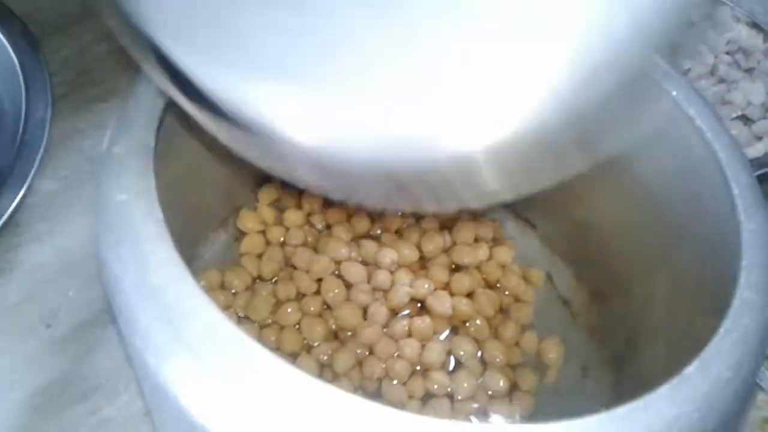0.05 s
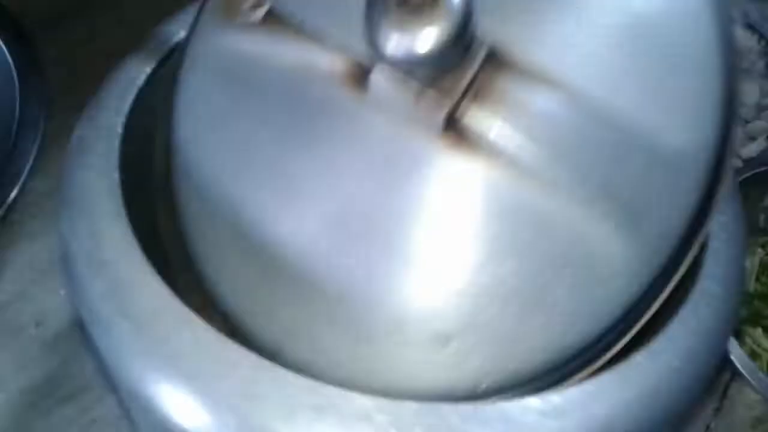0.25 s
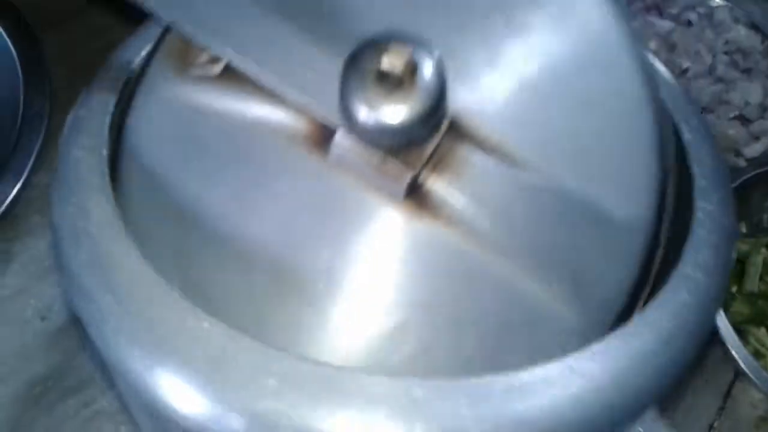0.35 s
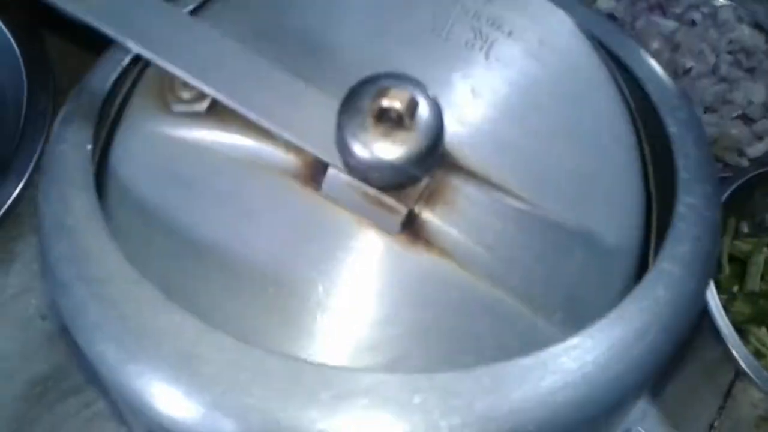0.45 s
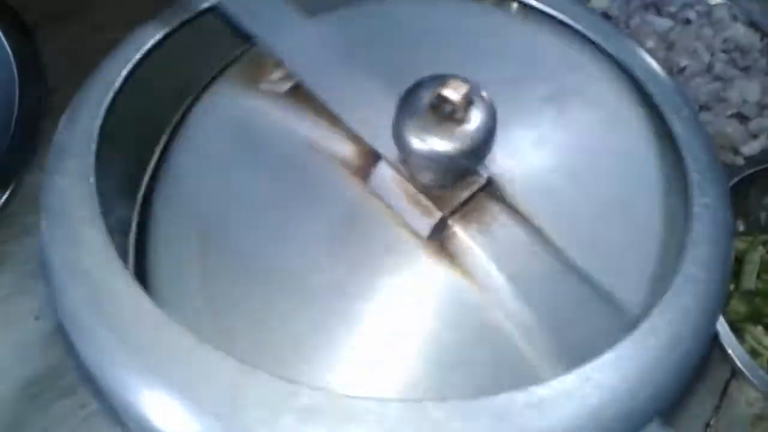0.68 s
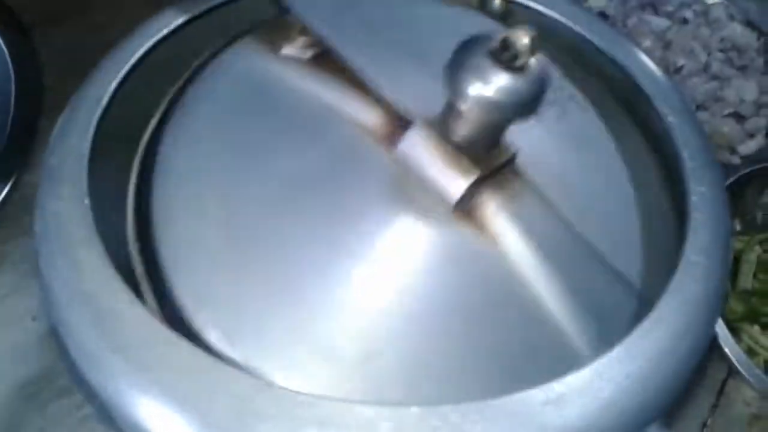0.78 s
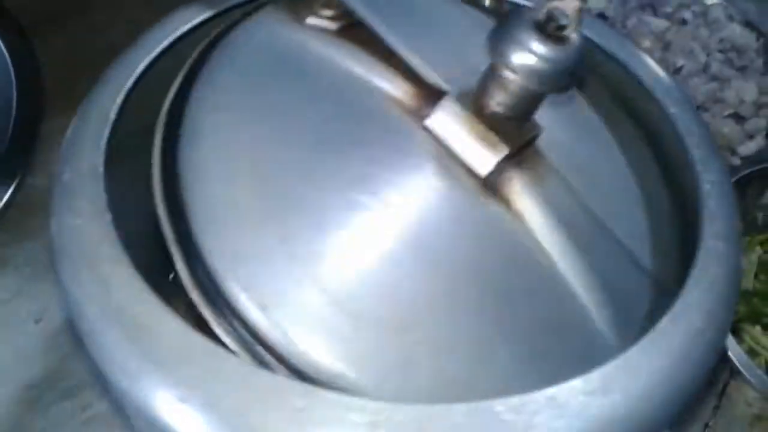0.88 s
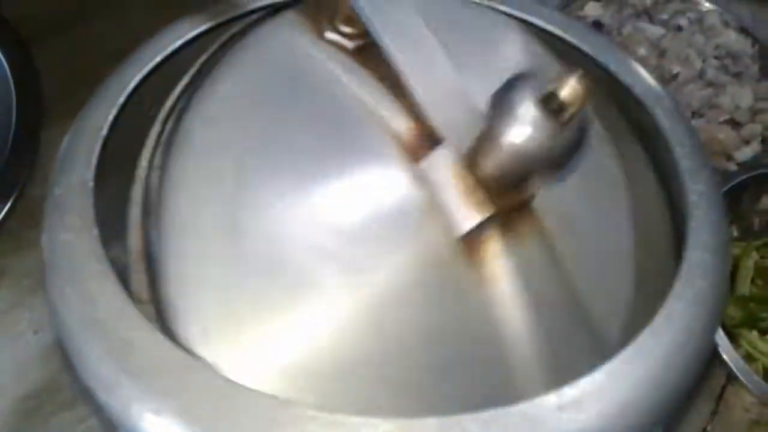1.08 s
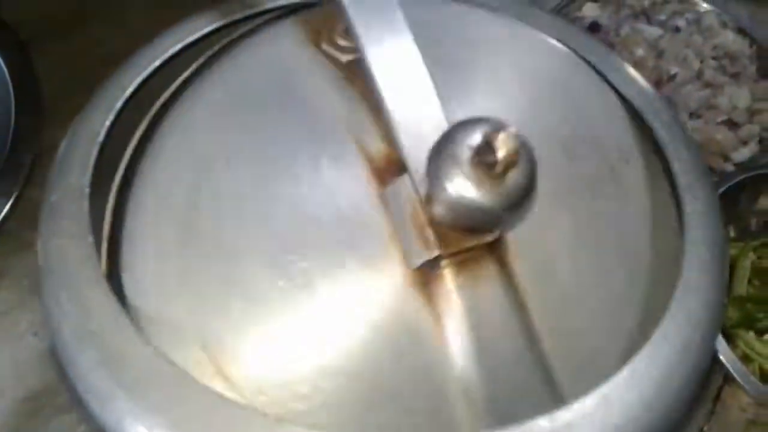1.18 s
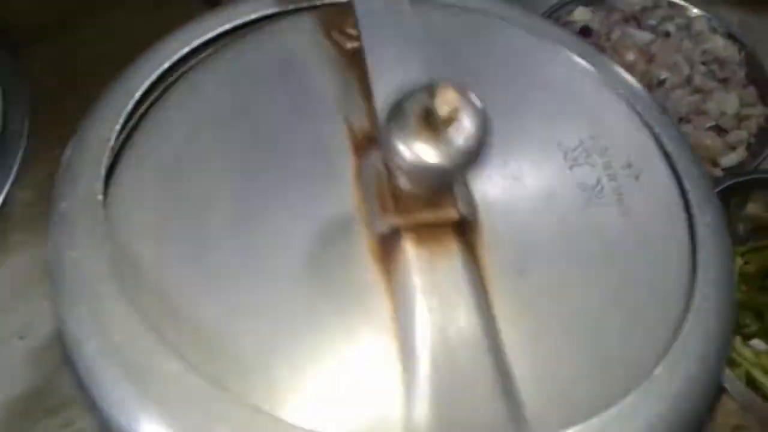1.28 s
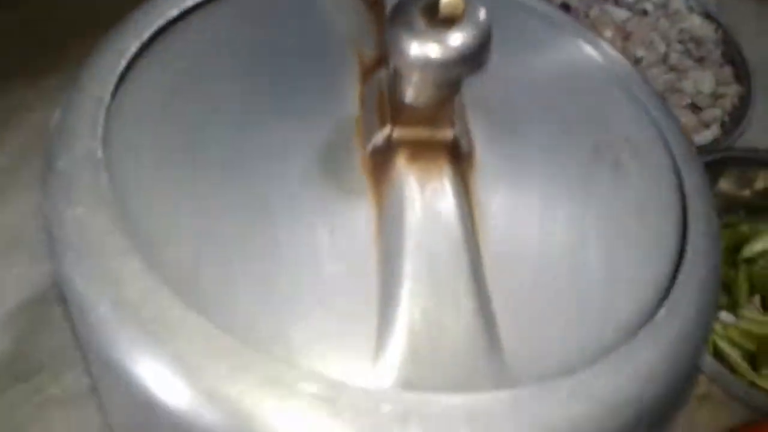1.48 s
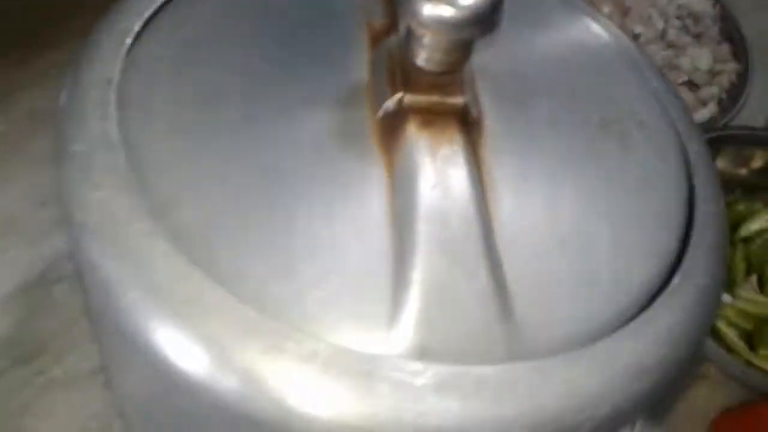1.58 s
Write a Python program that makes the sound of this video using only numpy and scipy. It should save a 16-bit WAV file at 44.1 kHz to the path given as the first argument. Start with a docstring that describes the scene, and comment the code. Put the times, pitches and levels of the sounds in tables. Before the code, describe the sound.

Close up in a hard-walled kitchen, a pressure cooker lid knocks against the pot and grates along its rim. The clanking peaks midway with a hollow thump, then softer taps and scrapes seat the lid.

```python
"""An aluminium pressure cooker lid is slipped into the pot's mouth, turned and pulled up into its seat.
Each contact cracks and sets lid, pot, handle bar and valve weight ringing; the rims scrape in between.
The moving lid makes the air in the pot boom at a pitch that sinks as the gap closes.
The pot thumps the counter, in a hard-walled kitchen with soft noise and a low rumble."""
import sys
import numpy as np
from scipy import signal
from scipy.fft import rfft, irfft, next_fast_len
from scipy.io import wavfile
from scipy.ndimage import uniform_filter1d, minimum_filter1d

SR = 44100
rng = np.random.default_rng(int(sys.argv[2]) if len(sys.argv) > 2 else 0)


def digitize_waveform(pressure):
    """Quantize a signal to 16-bit integers and store it at the path in sys.argv[1].

    Rows of a 2-D input are taken as channels; values are limited to [-1, 1].
    """
    field = np.atleast_2d(pressure).T
    bounded = np.clip(field, -1, 1)
    quanta = np.round(bounded * 32767).astype(np.int16)
    wavfile.write(sys.argv[1], SR, quanta)


N = 72765
FFT_SIZE = next_fast_len(N)
BIN_HZ = np.fft.rfftfreq(FFT_SIZE, 1 / SR)
TIME_S = np.arange(N) / SR
CUTOFF_HZ = 16000


def from_db(db):
    """Decibels to gain."""
    return 10 ** (np.asarray(db) / 20)


def unit_rms(x):
    """Scale to unit rms."""
    return x / np.sqrt(np.mean(x ** 2) + 1e-20)


def at_hz(points, hz):
    """Interpolate on a log-frequency axis."""
    freq_hz, value = np.transpose(points)
    return np.interp(np.log(hz + 1), np.log(freq_hz), value)


def since(start_s):
    """Seconds since start_s, zero before."""
    return np.maximum(TIME_S - start_s, 0)


def coloured(x, gain_db):
    """Filter with one gain per BIN_HZ."""
    return irfft(rfft(x, FFT_SIZE) * from_db(gain_db), FFT_SIZE)[:N]


def ring(drive, hz, t60_s):
    """One mode: a unit impulse starts a decaying unit sine."""
    radius = np.exp(-np.log(1000) / (t60_s * SR))
    angle = 2 * np.pi * hz / SR
    return signal.lfilter([0, np.sin(angle)], [1, -2 * radius * np.cos(angle), radius ** 2], drive + 1e-18)


def clicks(times_s, heights):
    """Impulses at the given times."""
    out = np.zeros(N)
    out[(np.asarray(times_s) * SR).astype(int)] = heights
    return out


# Kitchen noise and rumble spectra: freq_hz, level_db
NOISE_SPECTRUM = [(25, -30), (60, -20), (105, -24.5), (180, 4.5), (300, -3), (600, -5.5), (1500, -10),
                  (4000, -15), (7300, -20), (9000, -27), (15500, -45)]
RUMBLE_SPECTRUM = [(20, -31), (60, -8), (105, 2), (180, 4.5), (300, 2), (1000, -61)]
# Their envelopes: time_s, level_db
NOISE_ENVELOPE = [(0, -44), (0.22, -47.5), (0.45, -43), (0.78, -41), (0.95, -42), (1.15, -46.5),
                  (1.45, -43), (1.65, -57.5)]
RUMBLE_ENVELOPE = [(0, -52.5), (0.2, -49), (0.45, -47.5), (0.78, -48.5), (1.0, -51), (1.15, -59.5),
                   (1.65, -53)]


def background():
    """Soft kitchen noise and a low rumble, both drifting in level."""
    out = np.zeros(N)
    for spectrum, envelope in (NOISE_SPECTRUM, NOISE_ENVELOPE), (RUMBLE_SPECTRUM, RUMBLE_ENVELOPE):
        noise = unit_rms(coloured(rng.standard_normal(N), at_hz(spectrum, BIN_HZ)))
        out += from_db(np.interp(TIME_S, *np.transpose(envelope))) * noise
    return out


def kitchen_reverb(x, level_db=-11, delay_s=0.0031, t60_s=0.42, low_hz=170, top_hz=2980):
    """Hard walls return a short diffuse tail."""
    t = since(delay_s)
    band_db = -10 * np.log10((1 + (BIN_HZ / top_hz) ** 2) * (1 + (low_hz / (BIN_HZ + 1)) ** 6))
    tail = coloured(rng.standard_normal(N), band_db)
    fade = (t > 0) * np.exp(-np.log(1000) * t / t60_s)
    return from_db(level_db) * signal.fftconvolve(x, tail * fade / np.sqrt(np.sum(fade ** 2)))[:N]


# Pot on counter: start_s, level_db
KNOCKS = [(0.804, -14.5), (0.813, -33), (0.871, -4), (1.5389, -53)]
# Counter modes: pitch_hz, level_db, t60_s
COUNTER_MODES = [(65, -31, 0.027), (121, -7.5, 0.068), (187, 1.5, 0.03), (188.6, -25, 0.46),
                 (256, 1, 0.025)]


def counter_thumps():
    """The pot knocks the counter's low modes into dull thumps."""
    start_s, level_db = np.transpose(KNOCKS)
    return -sum(ring(clicks(start_s, from_db(level_db + mode_db)), hz, t60_s)
                for hz, mode_db, t60_s in COUNTER_MODES)


# Air resonance in the pot: time_s, pitch_hz
AIR_RESONANCE = [(0.23, 349), (0.36, 347), (0.50, 320), (0.58, 310), (0.66, 293), (0.75, 305), (0.89, 291),
                 (1.10, 293), (1.22, 308), (1.36, 297), (1.43, 246)]
# Lid pushing the air: start_s, length_s, level_db
AIR_PUSHES = [(0.236, 0.029, -22), (0.336, 0.031, -30.5), (0.408, .03, -36), (0.496, 0.075, -24.5),
              (0.652, 0.031, -21.5), (0.733, 0.038, -26), (0.801, 0.031, -24), (0.879, 0.046, -9.5),
              (0.985, 0.037, -22.5), (1.086, 0.035, -31), (1.2, 0.0087, -23), (1.263, 0.055, -29),
              (1.354, 0.016, -22), (1.404, 0.032, -27.5), (1.457, 0.018, -28), (1.521, 0.046, -35.5)]


def pot_air(rise_s=0.011, t60_s=0.11):
    """The air under the lid swells while driven, then dies, at a pitch set by the gap."""
    pitch_hz = np.interp(TIME_S, *np.transpose(AIR_RESONANCE))
    swell = np.zeros(N)
    for start_s, length_s, level_db in AIR_PUSHES:
        rise = 1 - np.exp(-since(start_s) / rise_s)
        decay = np.exp(-np.log(1000) * since(start_s + length_s) / t60_s)
        swell += from_db(level_db) * rise * decay
    return swell * np.sin(2 * np.pi * np.cumsum(pitch_hz) / SR)


# Modes of each part, in paired lists: pitch_hz; level_db
LID_MODE_HZ = [686, 746, 878, 1305, 1442, 1605, 2048, 2181, 2260, 3110, 4334, 4861, 6063, 7065]
LID_MODE_DB = [-0.5, -7, -14.5, -19, 0, -6.5, 3.5, -0.5, 0, -3, -1, -7, -9, -16]
POT_MODE_HZ = [668, 1031, 1520, 1562, 1836, 2353, 3531, 3687, 4247, 4431, 4726, 6425, 6575, 6691]
POT_MODE_DB = [-14, -14, -6, -4, -14.5, -2.5, 1, 1.5, -0.5, -14, -15, -4, -11, -6.5]
BAR_MODE_HZ = [450, 518, 1033, 1349, 1436, 1520, 1548, 1585, 3701, 4940, 5230, 6110, 6480]
BAR_MODE_DB = [-5, -3.5, -4, -7.5, -9.5, -4, 1, -3, 0, -10, -4.5, -5.5, -15.5]
VALVE_MODE_HZ = [1468, 1570, 3010, 3205, 4730, 4785, 4820, 6063, 6540, 6648, 7450, 7570]
VALVE_MODE_DB = [0.5, -5, -6, -1, -5.5, -1, 2.5, -6.5, 0, -11, -0.5, -4]


def modes(part):
    """One part's rows of pitch_hz, level_db, t60_s; high modes die sooner."""
    pitches_hz, levels_db, t60_at_1khz_s = {
        "lid": (LID_MODE_HZ, LID_MODE_DB, 0.47),
        "pot": (POT_MODE_HZ, POT_MODE_DB, 0.37),
        "bar": (BAR_MODE_HZ, BAR_MODE_DB, 0.33),
        "valve": (VALVE_MODE_HZ, VALVE_MODE_DB, 0.13)}[part]
    return [(hz, db, t60_at_1khz_s * (hz / 1000) ** -0.42) for hz, db in zip(pitches_hz, levels_db)]


# Spectrum common to scrapes and contacts: freq_hz, level_db
METAL_SPECTRUM = [(40, -41), (100, -38), (220, -4), (400, -4.5), (500, -3.5), (650, -6.5), (850, 2),
                  (1200, -10.5), (1530, 1), (1850, -7.5), (2250, -2.5), (2700, -7.5), (3500, -7),
                  (4700, -5), (5500, -7.5), (6600, -5.5), (7600, -3.5), (8500, -12), (12000, -11),
                  (15500, -22.5)]
# Rim strokes: start_s, end_s, level_db, tilt_db_per_octave, lid_drive_db
RIM_STROKES = [(0.417, 0.494, -30.5, -3.5, -75), (0.517, 0.588, -35, 0, -81), (0.62, 0.743, -43, -0.5, -75),
               (0.772, 0.803, -50, -8, -80), (0.832, 0.835, -25, -2, -64), (1.158, 1.197, -36.5, -4, -96),
               (1.174, 1.266, -38.5, 0, -74), (1.285, 1.374, -52.5, 2.5, -89),
               (1.36, 1.443, -37, -2.5, -83)]


def rim_scrapes(catches_per_s=1500, spread_db=2, clumps_per_s=190, clump_db=4.5,
                smear_s=0.0023, edge_s=0.007):
    """The rims catch in gritty clumps of tiny slips, which also keep the lid singing."""
    spectrum_db = at_hz(METAL_SPECTRUM, BIN_HZ) + at_hz([(7500, 0.011), (10000, -9)], BIN_HZ)
    octaves = np.log2(np.maximum(BIN_HZ, 700) / 2000)
    scrape, lid_drive = np.zeros(N), np.zeros(N)
    for start_s, end_s, level_db, tilt_db_per_octave, lid_drive_db in RIM_STROKES:
        sizes = from_db(spread_db * np.minimum(rng.exponential(1, N), 5)) * rng.choice([-1, 1], N)
        shell_response = rng.standard_normal(N) * np.exp(-TIME_S / smear_s)
        clumps = from_db(clump_db * np.interp(TIME_S * clumps_per_s, np.arange(N), rng.standard_normal(N)))
        catches = rng.random(N) < catches_per_s / SR
        slips = unit_rms(signal.fftconvolve(clumps * sizes * catches, shell_response)[:N])
        stroke = (1 - np.exp(-since(start_s) / edge_s)) * np.exp(-since(end_s) / edge_s)
        grit = coloured(slips, spectrum_db + tilt_db_per_octave * octaves)
        scrape += from_db(level_db + 11) * stroke * grit
        lid_drive += from_db(lid_drive_db) * stroke * slips
    return scrape + sum(from_db(db) * ring(lid_drive, hz, t60_s) for hz, db, t60_s in modes("lid"))


# Hard contacts: start_s, lid_db, pot_db, bar_db, valve_db
BLOWS = [(0.2337, -38, -58, -22, -25), (0.3955, -32, -39.5, -29, -36), (0.5027, -27, -34, -50, -48),
         (0.5405, -26, -34, -56, -32), (0.6579, -39.5, -53, -62, -46), (0.7447, -35.5, -53, -58, -35),
         (0.8158, -31.5, -31, -33.5, -14), (0.8975, -31, -17.5, -39.5, -28), (1.2082, -44, -52, -46, -37),
         (1.2625, -40.5, -51, -44, -60), (1.3533, -41, -38.5, -43, -46)]


def clangs(spread_db=3):
    """Hard contacts strike the strong modes of lid, pot, handle bar and valve weight."""
    start_s, *blows_db = np.transpose(BLOWS)
    out = np.zeros(N)
    for part, blow_db in zip(("lid", "pot", "bar", "valve"), blows_db):
        for hz, mode_db, t60_s in modes(part):
            heights = from_db(blow_db + mode_db + spread_db * rng.standard_normal(len(start_s)))
            jitter_s = rng.random(len(start_s)) / hz
            out += ring(clicks(start_s + jitter_s, heights), hz, t60_s)
    return out


# Contact bands: freq_hz
BAND_HZ = [700, 1600, 3500, 6500, 12000]


def contact_db(bands_db, hz):
    """One contact's spectrum: the metal's, shaped by five band levels."""
    return at_hz(METAL_SPECTRUM, hz) + at_hz(list(zip(BAND_HZ, bands_db)), hz) + 8.5


# Lid on rim: start_s, length_s, level_db at each of the five BAND_HZ, shimmer_offset_db
RIM_CONTACTS = [(0.0137, 0.0038, -39, -65, -57, -39, -45, 0),
                (0.0638, 0.0037, -62, -44, -32, -26.5, -61, -16),
                (0.1444, 0.0083, -48, -36, -30.5, -31.5, -51, -15),
                (0.2096, 0.0035, -41, -48, -32, -57, -67, -25),
                (0.2337, 0.0045, -5.5, -9.5, -25, -10.5, -33, -10.5),
                (0.3485, 0.0098, -24, -29, -36.5, -36, -53, -1),
                (0.3946, 0.0064, -6.5, -17, -14.5, -21.5, -34, -20),
                (0.5029, 0.0077, -12, -6, -8.5, -8.5, -19.5, -12.5),
                (0.541, 0.0044, -11, -12.5, -18, -17.5, -28, -11.5),
                (0.575, 0.014, -19.5, -20.5, -24.5, -29.5, -39, -5),
                (0.6563, 0.019, -32.5, -18.5, -31.5, -46, -59, 4.5),
                (0.7455, .007, -22.5, -23.5, -31, -22, -34.5, -7.5),
                (0.771, 0.0051, -25, -23, -38, -20.5, -43, -24),
                (0.7948, 0.004, -25.5, -20, -16, -24.5, -30, -0.5),
                (0.799, 0.0067, -9.5, -9.5, -18, -6, -19, -40),
                (0.8186, 0.0099, -19, -10.5, -11, -11.5, -29.5, -4),
                (0.8697, 0.0066, -8, -3.5, -12.5, -9.5, -9, -21),
                (0.8932, 0.023, -21, -28, -16.5, -10, -24, -7.5),
                (0.924, 0.027, -19.5, -19.5, -14.5, -17, -27.5, -9.5),
                (1.0007, .007, -24, -25, -25, -23, -37, -5.5),
                (1.1645, 0.0088, -42, -45, -38.5, -39, -55, -8),
                (1.1932, 0.012, -29, -36, -26, -31.5, -40, -2),
                (1.2081, 0.0059, -18, -23, -23.5, -20.5, -43, -6),
                (1.246, 0.0087, -26.5, -25, -18, -23.5, -42, -8.5),
                (1.2608, 0.0077, -16, -22.5, -22.5, -22, -35, -13),
                (1.3534, 0.025, -20.5, -20.5, -32.5, -20, -35.5, -11.5),
                (1.404, 0.025, -36.5, -26, -39, -34, -48, -12),
                (1.5393, 0.019, -34.5, -34.5, -42.5, -42, -66, -6.5)]


def cracks(snap_db=-8.5, snap_s=0.0021):
    """Each contact snaps, then metal chatters briefly on metal."""
    out = np.zeros(N)
    for start_s, length_s, *bands_db, _ in RIM_CONTACTS:
        t = since(start_s)
        snap = from_db(snap_db) * np.exp(-t / snap_s)
        chatter = np.exp(-(t / length_s) ** 1.35 / 2)
        noise = coloured(rng.standard_normal(N), contact_db(bands_db, BIN_HZ))
        out += noise * (t > 0) * (snap + chatter)
    return out


# Decay of the weak shell modes: pitch_hz, t60_s
SHELL_DECAY = [(300, 0.56), (1500, 0.26), (4000, 0.42), (7500, 0.25), (14000, 0.24)]


def shimmer(count=480, low_hz=200, rise_s=0.003):
    """Each contact strikes a crowd of weak shell modes, each at a random strength."""
    edges_hz = np.linspace(np.sqrt(low_hz), np.sqrt(CUTOFF_HZ), count + 1) ** 2
    widths_hz = np.diff(edges_hz)
    pitches_hz = edges_hz[:-1] + widths_hz * rng.random(count)
    strengths = from_db([contact_db(bands_db, pitches_hz) + offset_db
                         for _, _, *bands_db, offset_db in RIM_CONTACTS])
    strengths *= 2 * np.sqrt(widths_hz / SR) * rng.standard_normal(strengths.shape)
    times_s = np.array(RIM_CONTACTS)[:, 0] + rise_s * rng.random((count, len(RIM_CONTACTS)))
    return sum(ring(clicks(times_s[k], strengths[:, k]), hz, at_hz(SHELL_DECAY, hz))
               for k, hz in enumerate(pitches_hz))


def scene(radiation_hz=248):
    """Cooker, counter and kitchen, mono; thin metal radiates little bass."""
    highpass = signal.butter(2, radiation_hz, "high", fs=SR, output="sos")
    metal = signal.sosfilt(highpass, cracks() + shimmer() + clangs() + rim_scrapes())
    solids = metal + counter_thumps()
    return (solids + pot_air() + kitchen_reverb(solids) + background())[None]


def record(dry, ceiling=0.9, half_window_s=0.0005):
    """Fast peak limiter, then a steep low-pass."""
    window = 2 * int(half_window_s * SR) + 1
    needed_gain = ceiling / np.maximum(np.abs(dry), ceiling)
    gain = uniform_filter1d(minimum_filter1d(needed_gain, window), window)
    lowpass = signal.ellip(10, 0.1, 70, CUTOFF_HZ, fs=SR, output="sos")
    return signal.sosfilt(lowpass, dry * gain)


dry = scene()
out = record(dry)
digitize_waveform(out)
```